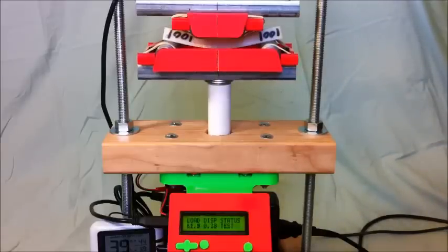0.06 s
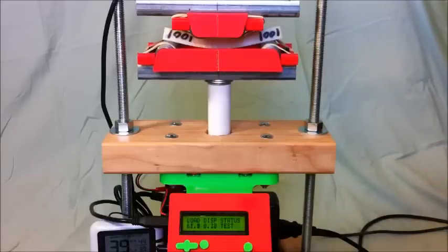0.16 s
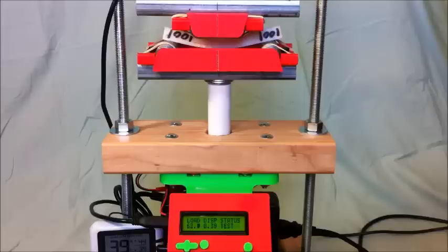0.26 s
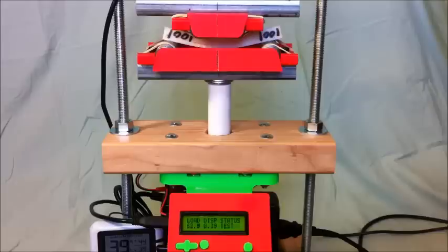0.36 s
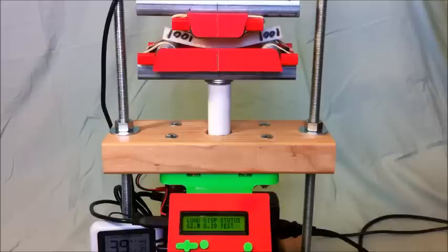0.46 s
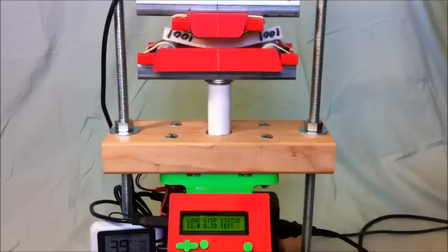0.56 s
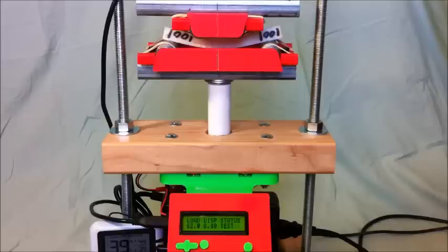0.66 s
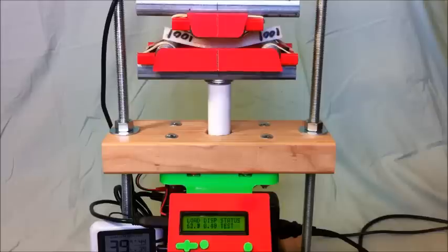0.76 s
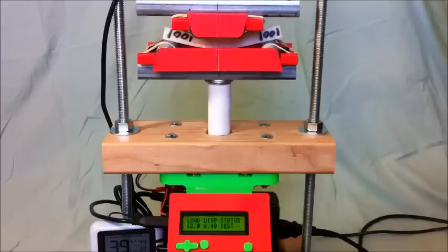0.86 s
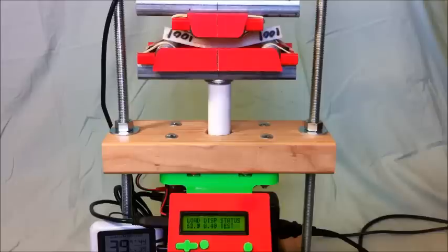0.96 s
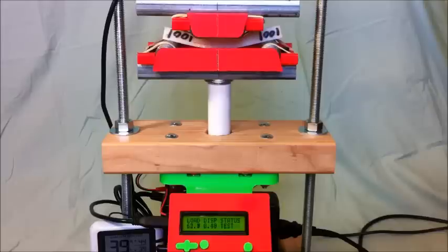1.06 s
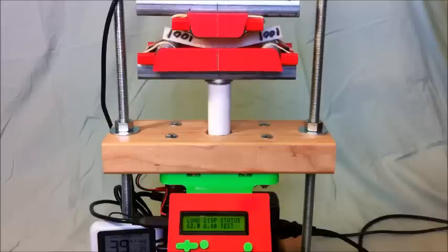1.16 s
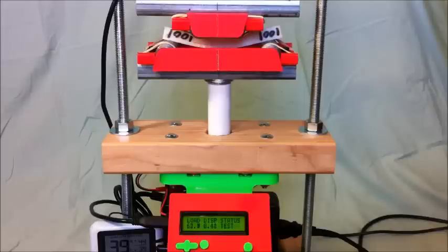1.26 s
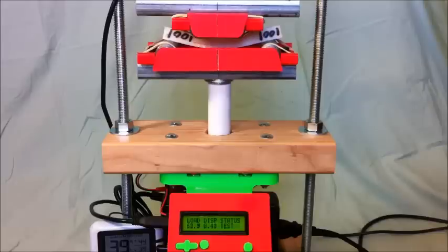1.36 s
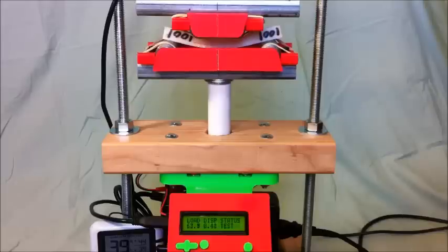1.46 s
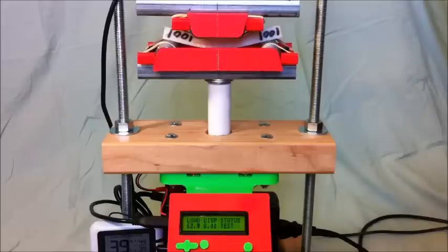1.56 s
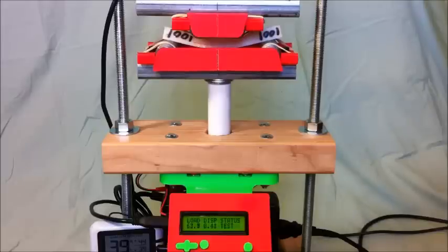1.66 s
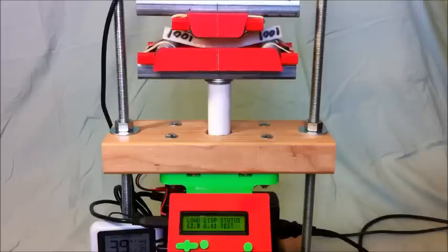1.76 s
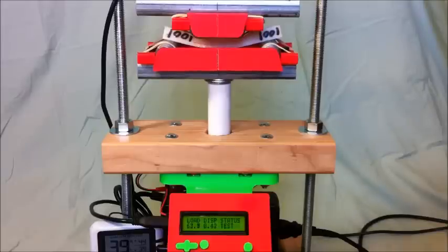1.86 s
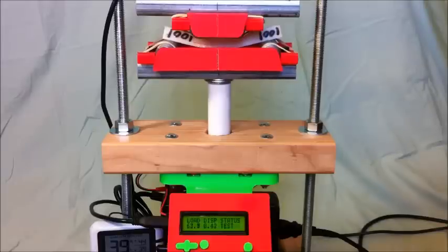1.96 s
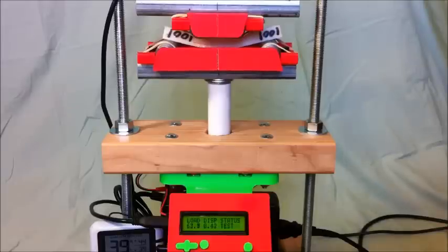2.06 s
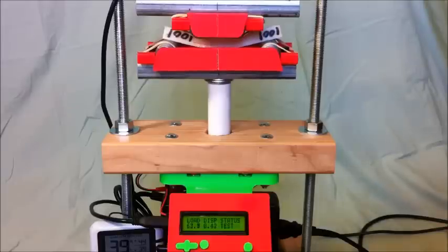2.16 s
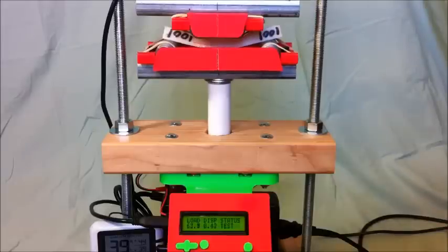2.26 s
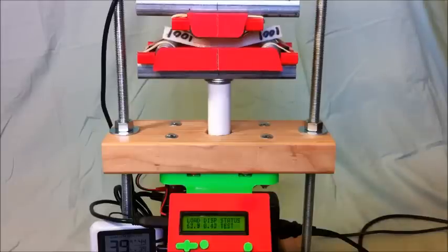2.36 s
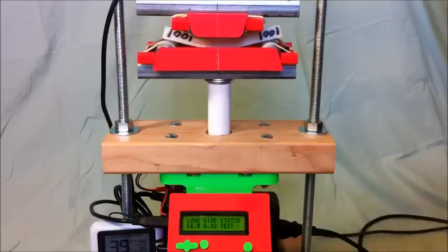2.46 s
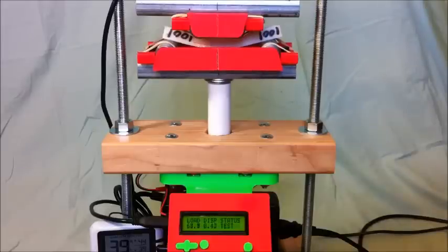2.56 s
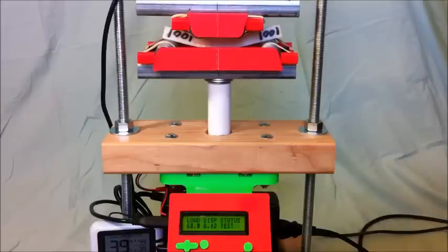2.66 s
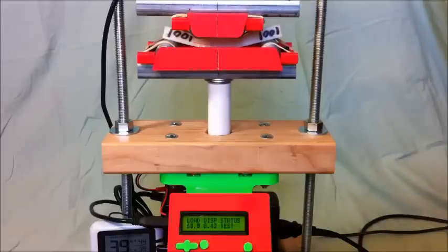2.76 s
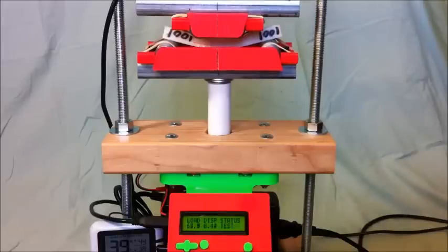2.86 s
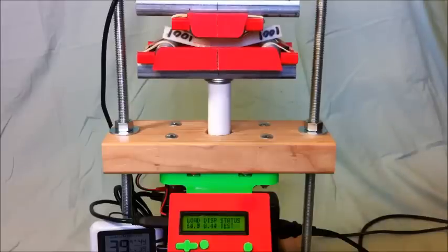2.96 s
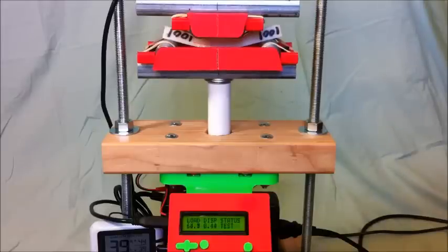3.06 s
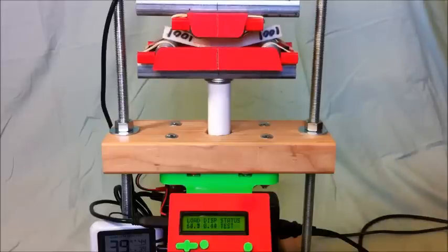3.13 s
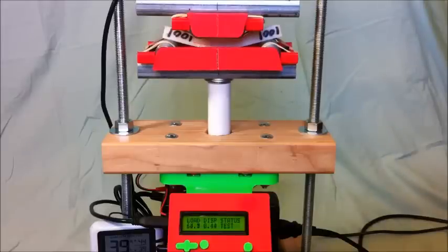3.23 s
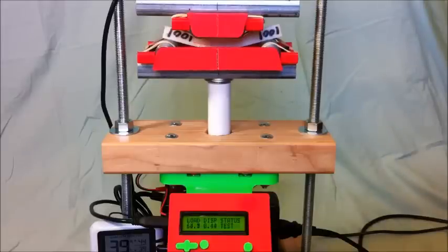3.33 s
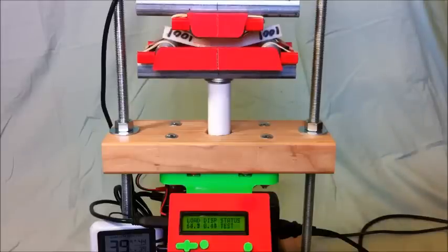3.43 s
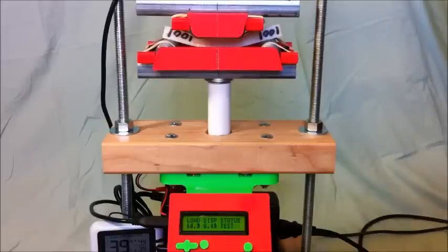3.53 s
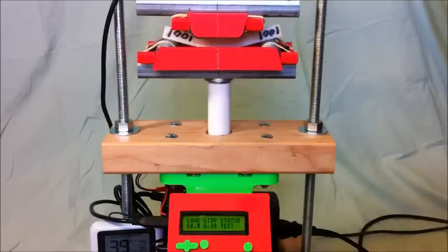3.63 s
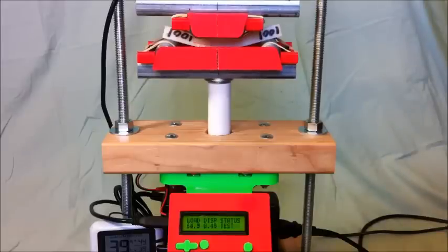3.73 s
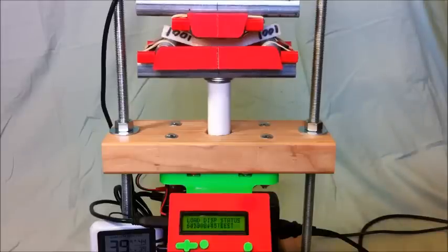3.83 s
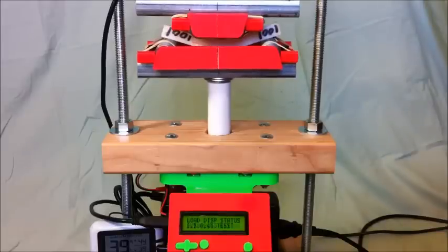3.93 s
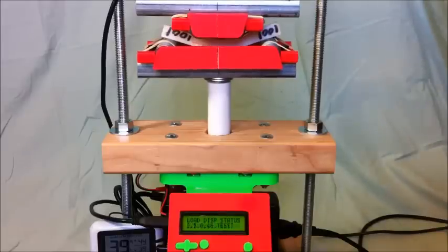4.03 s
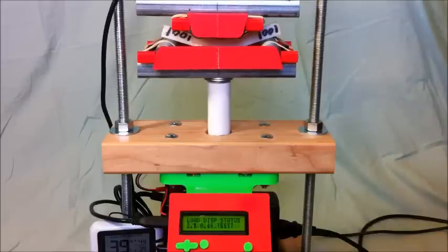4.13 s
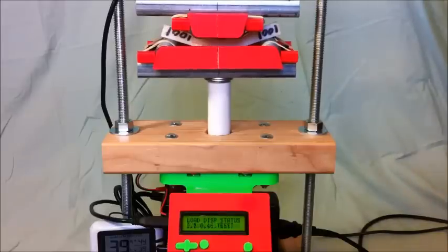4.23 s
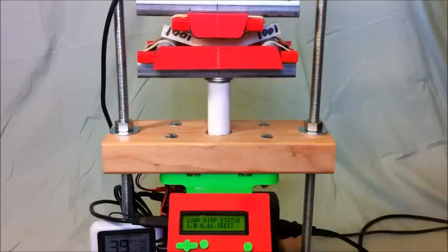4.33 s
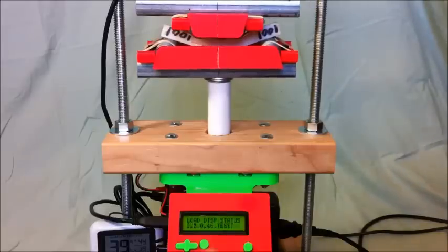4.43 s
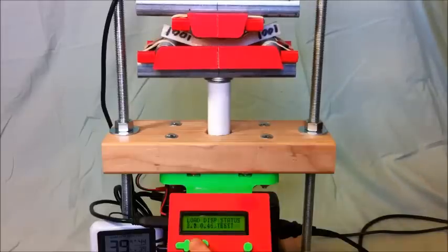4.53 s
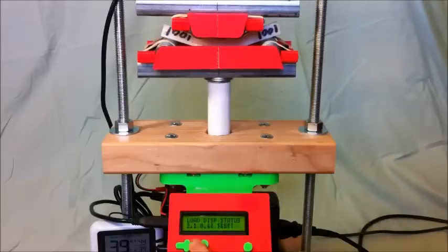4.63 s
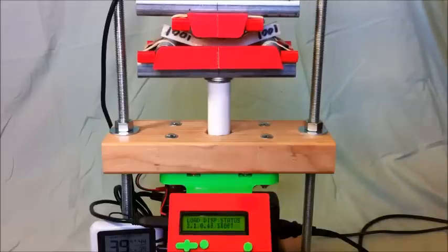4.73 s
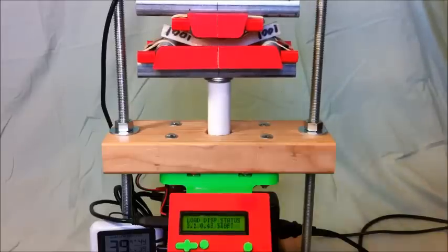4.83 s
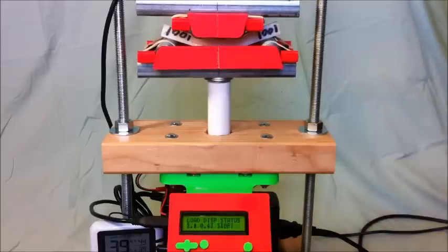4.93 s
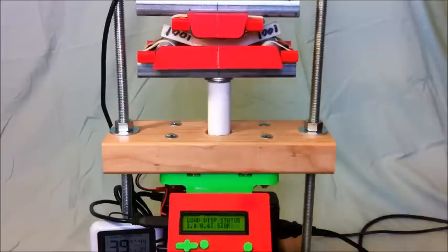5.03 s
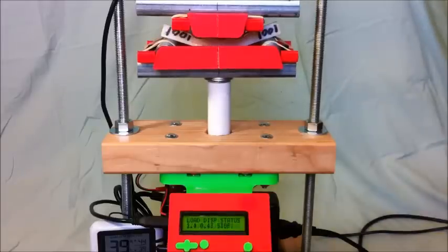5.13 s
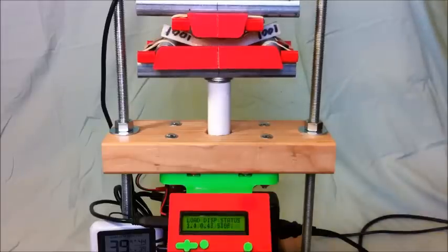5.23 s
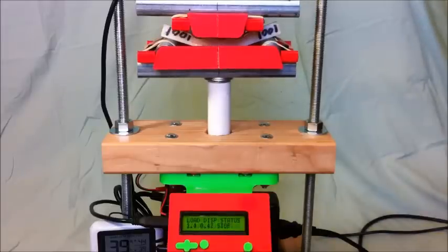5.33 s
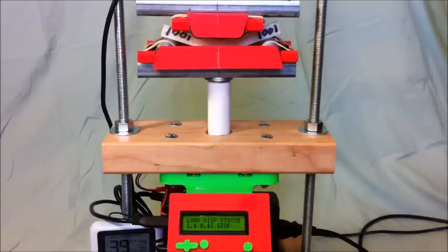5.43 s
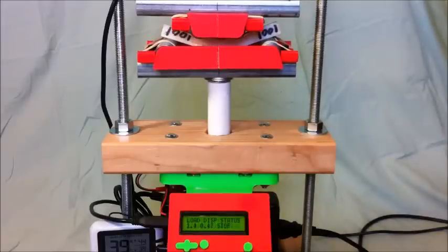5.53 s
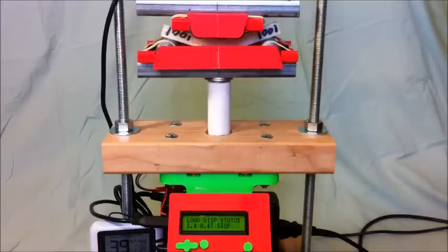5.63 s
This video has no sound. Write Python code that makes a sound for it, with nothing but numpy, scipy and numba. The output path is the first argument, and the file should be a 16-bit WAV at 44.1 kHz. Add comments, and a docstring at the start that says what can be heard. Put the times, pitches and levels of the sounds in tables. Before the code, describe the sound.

A stepper motor buzzes steadily as a press loads a plastic part, rattling, until a sharp crack; the motor stops and a small fan whines on.

```python
"""Stepper-driven screw press

A stepper motor drives a press of wood, threaded rods and plastic jaws, close to a microphone.
Each step is a knock filtered by the frame, with noise for gear grind; loose parts rattle in bursts.
The specimen ticks and cracks as noise bursts through jaw resonances, over a faint unsteady low noise.
The motor stops; a small fan, summed blade tones over shaped noise, whines on."""
import sys
import numpy as np
from scipy import signal
from scipy.fft import rfft, irfft, next_fast_len
from scipy.io import wavfile
from scipy.ndimage import uniform_filter1d
from numba import njit

SR = 44100
rng = np.random.default_rng(int(sys.argv[2]) if len(sys.argv) > 2 else 0)


def persist_wave(psi):
    """Save psi, clipped to +-1, as 16-bit WAV."""
    counts = np.round(np.clip(psi, -1, 1) * 32767).astype(np.int16)
    wavfile.write(sys.argv[1], SR, np.atleast_2d(counts).T)


N = 250929
T = np.arange(N) / SR

# motor stages, the frame settling differently in each: start_s, end_s, step_rate_hz
MOTOR_STAGES = [(.0006, 1.1294, 124.02), (1.1294, 2.2984, 124.02), (2.2984, 3.1141, 120.15),
                (3.1141, 3.8806, 120.15), (3.8806, 4.668, 124.02)]
# ticks of the specimen, the third is the crack:
# start_s, peak_db, tail_t60_s, tail_share (ratio), struck_centre_hz, reach_octaves
FRACTURES = [(1.9681, -23.5, 0.065, 0.58, 3220, 1.05), (3.117, -33.5, .05, .6, 1570, 0.18),
             (3.8785, -8, 0.063, 1, 3980, 3.6), (4.7065, -38, .03, .3, 4500, 0.9),
             (5.019, -40, .02, .2, 6000, 4.6), (5.2044, -39, .03, .3, 8000, 0.61)]
CRACK_S = FRACTURES[2][0]
LAST_STAGE_S, MOTOR_STOP_S = MOTOR_STAGES[-1][:2]


def undb(db):
    """Decibels to amplitude ratio."""
    return 10 ** (np.asarray(db) / 20)


def unit(x):
    """Scale to rms 1."""
    return x / np.sqrt(np.mean(x ** 2))


def columns(table):
    """Table columns interpolated over time, one value per sample."""
    time_s, *values = np.transpose(table)
    return [np.interp(T, time_s, v) for v in values]


def walk(rate_hz):
    """Random levels held 1 / rate_hz and slewed twice; spread near 1."""
    hold = int(SR / rate_hz)
    held = np.repeat(rng.standard_normal(N // hold + 1), hold)
    return 1.307 * uniform_filter1d(uniform_filter1d(held, hold), hold)[:N]


def response(points, size=8192):
    """Minimum-phase impulse response through (Hz, dB) points, from the folded cepstrum."""
    hz, db = np.transpose(points)
    grid_hz = np.maximum(np.arange(size // 2 + 1), 1) * SR / size
    cepstrum = irfft(np.interp(np.log(grid_hz), np.log(hz), db) * np.log(10) / 20)
    cepstrum[1:size // 2] *= 2
    cepstrum[size // 2 + 1:] = 0
    return irfft(np.exp(rfft(cepstrum)))[:size // 2]


def filtered_noise(order, cutoff_hz):
    """Low-passed white noise."""
    sos = signal.butter(order, cutoff_hz, fs=SR, output="sos")
    return signal.sosfilt(sos, rng.standard_normal(N))


def rumble():
    """Faint unsteady low noise, stronger until the motor stops; the crack jolts it."""
    deep_noise, low_noise = unit(filtered_noise(4, 70)), unit(filtered_noise(4, 280))
    low_noise_level = undb(-98 + 10 * np.minimum(walk(55), 1.7) - 20 * (T > MOTOR_STOP_S))
    age_s, jolt_t60_s = np.maximum(T - CRACK_S, 0), 0.11
    jolt = undb(-60) * (age_s > 0) * undb(-60 * age_s / jolt_t60_s)
    sway_db = 2.4 * walk(14)
    return deep_noise * undb(-86.5 + sway_db) + low_noise * (low_noise_level + jolt)


def fan():
    """Harmonics of a slightly wavering blade rate, the 15th being the whine, over the rush of air."""
    # whine: time_s, whine_hz (15 x blade rate), whine_db
    whine_curve = [(0.0, 8740, -49), (0.47, 8596, -53), (2.84, 8660, -51), (4.01, 8620, -54.5),
                   (4.64, 8620, -54.5), (4.9, 8586, -52), (5.69, 8500, -51.5)]
    # tones: multiple of blade rate (ratio), level_db against the whine
    blade_tones = [(1, -26), (2, -25), (4, -24), (5, -15.5), (7, -18), (9, -22.5), (10, -14), (11, -21),
                   (12, -16), (15, -4.5), (16, -17.5), (20, -27.5), (23, -68), (25, -22)]
    # level of all tones but the whine: they swell while the motor runs, then drop back
    # as it stops: time_s, change_db
    body_curve = [(0, -4.5), (4.6, 4), (4.75, -1), (5.69, 0.5)]
    # spectral shape of the air noise: pitch_hz, relative density_db per Hz
    air_shape = [(100, -125), (200, -130), (320, -110), (500, -99), (1200, -100), (2000, -96.5),
                 (2500, -92.5), (3100, -93.5), (3700, -87.5), (4600, -94), (6000, -98.5), (8500, -91),
                 (9500, -98.5), (12000, -100), (15700, -99)]
    air_db = -55.5

    whine_hz, whine_db = columns(whine_curve)
    body_db, = columns(body_curve)
    blade_hz = whine_hz / 15 * (1 + 0.000745 * walk(30))
    turn = 2 * np.pi * np.cumsum(blade_hz) / SR
    tones = np.zeros(N)
    for k, db in blade_tones:
        tone_db = db + (k != 15) * body_db + 0.96 * walk(25.41)
        tones += undb(tone_db) * np.sin(k * turn + 2 * np.pi * rng.random())
    air = unit(signal.fftconvolve(rng.standard_normal(N), response(air_shape))[:N])
    return np.sqrt(2) * tones * undb(whine_db) + air * undb(air_db + 0.09 * walk(5.7))


def ring(x, modes):
    """Sum of parallel resonances (Hz, width Hz, dB)."""
    return sum(undb(db) * signal.lfilter(*signal.iirpeak(hz, hz / width_hz, SR), x)
               for hz, width_hz, db in modes)


def ticks():
    """A sharp break, a burst of tearing fibres and a scattered tail ring the jaws."""
    # jaw and specimen modes, before weighting by distance from the struck centre:
    # pitch_hz, width_hz, level_db
    jaw_modes = [(597, 500, -14), (860, 58, -4), (1270, 180, -1), (1480, 95, 9), (2000, 540, -12),
                 (2300, 490, -9.5), (3560, 440, -8), (5350, 1000, -13.5), (6570, 700, -9.5),
                 (9700, 1300, -7), (12600, 2900, -2.5), (15400, 1800, -21)]
    high_pass = signal.butter(3, 450, "high", fs=SR, output="sos")
    out = np.zeros(N)
    age_s = np.arange(SR // 5) / SR
    for start_s, peak_db, t60_s, tail_share, centre_hz, reach_oct in FRACTURES:
        envelope = np.exp(-(age_s / 0.0015) ** 4) + tail_share * undb(-60 * age_s / t60_s)
        burst = envelope * np.minimum(age_s / .0003, 1) * rng.standard_normal(len(age_s))
        burst[20] += 5.5  # the sharp break
        struck = [(hz, width_hz, db - 12 * (np.log2(hz / centre_hz) / reach_oct) ** 2)
                  for hz, width_hz, db in jaw_modes]
        hit = signal.sosfilt(high_pass, ring(burst, struck))
        i = int(start_s * SR)
        out[i:i + len(age_s)] += undb(peak_db) * hit / np.abs(hit).max()
    return out


def steps(start_s, end_s, rate_hz, jitter_s, scatter_db):
    """One band-limited knock per step, a little uneven in time and size."""
    at_s = np.arange(start_s, end_s, 1 / rate_hz)
    chance = rng.standard_normal((len(at_s), 2))
    place = np.maximum((at_s + jitter_s * chance[:, 0]) * SR, 8)
    taps = place.astype(int)[:, None] + np.arange(-8, 9)
    offset = taps - place[:, None]
    # windowed sinc places each knock between samples
    knocks = undb(scatter_db * chance[:, 1:]) * np.sinc(offset) * np.cos(np.pi * offset / 18) ** 2
    out = np.zeros(N)
    np.add.at(out, taps, knocks)
    return out


def spread(h, spread_s):
    """Sound leaves the frame at many places: each frequency arrives with its own lag."""
    size = 2 * len(h)
    lag = np.repeat(rng.random(64), size // 128)
    smooth_lag_s = uniform_filter1d(lag, size // 128) * spread_s
    phase = np.cumsum(smooth_lag_s) * 2 * np.pi * SR / size
    return irfft(rfft(h, size) * np.exp(-1j * np.append(0, phase)))[:len(h)]


def parts(x, span):
    """Split into the bands where the frame parts ring, each at rms 1 over the span."""
    # band edges of the parts, low to high: edge_hz
    part_edges_hz = [310, 680, 1050, 1280, 1600, 2150, 2450, 2850, 3700, 4700, 5900, 8300, 12000, 16000]
    size = next_fast_len(N)
    spectrum, hz = rfft(x, size), np.arange(size // 2 + 1) * SR / size
    below = [1 / (1 + np.exp(np.clip((hz - edge_hz) / 15, -50, 50))) for edge_hz in part_edges_hz]
    out = np.array([irfft(spectrum * (hi - lo), size)[:N] for lo, hi in zip(below, below[1:])])
    return out / np.sqrt(np.mean(out[:, span] ** 2, axis=1, keepdims=True))


def edge(since_s, width_s):
    """Smooth switch from 0 to 1 around since_s = 0."""
    return .5 + .5 * np.tanh(since_s / width_s / 2)


def ringing():
    """Level of every part in dB: settled level, slack near the crack, rattle bursts, wander, stop."""
    # level_db per motor stage, before slack; rows: table, screw, rods, motor can, housing,
    # coupling, jaws, washers, nuts
    settled_db = [(-63.5, -62, -65.5, -64.5, -61), (-61.5, -59.5, -59.5, -64.5, -53.5),
                  (-54.0, -56.0, -57, -56, -49), (-58.5, -58.5, -56.5, -60, -57.5),
                  (-57.0, -56.5, -55.5, -56.5, -57), (-61.5, -59.5, -59.5, -60.5, -57.5),
                  (-61.5, -58.5, -60.5, -65, -58.5), (-61.5, -60.5, -61.5, -63, -54),
                  (-72, -69, -69.5, -76, -67)]
    # hum carried by parts as the load shifts: time_s, beam_db, crossbar_db, plates_db, gearbox_db
    hum_curve = [(0.0, -56.5, -59, -60, -51.5), (0.17, -59.5, -62, -61.5, -54),
                 (0.22, -61, -63.5, -49.5, -58), (0.55, -61.5, -60.5, -50.5, -50),
                 (1.1, -59.5, -62, -57.5, -53.5), (1.35, -57.5, -63, -56, -54.5),
                 (1.95, -56.0, -60, -58.5, -57), (2.08, -57, -60, -61.0, -52), (2.12, -55.5, -61, -70, -49),
                 (2.3, -54.5, -62.0, -58.5, -55), (2.33, -53, -60.5, -58.5, -53),
                 (2.95, -54.0, -62, -61, -54.5), (3.05, -55.5, -55.5, -62, -55.0),
                 (3.35, -55.5, -56.5, -58.5, -54.5), (3.6, -61.5, -54.5, -57.0, -59),
                 (3.87, -56.5, -55.5, -57, -52.5), (3.92, -60.5, -64.0, -55, -66),
                 (4.2, -60.0, -54.5, -62, -58.5), (4.6, -57, -54, -52, -59),
                 (4.67, -55.5, -56.5, -58, -60.5)]
    # bursts, before each part's share: start_s, length_s, plates_db, screw_db,
    # gearbox_and_rods_db, housing_db, jaws_db, washers_and_nuts_db
    rattle_bursts = [(0.168, 0.048, -70.0, -70.0, -68, -49.5, -58.5, -53),
                     (0.463, 0.043, -68, -70.0, -47.0, -66, -68, -64),
                     (1.141, 0.017, -52, -52, -43.5, -58, -47, -51),
                     (1.175, 0.026, -70.0, -50, -47, -51.5, -60, -56),
                     (1.244, 0.013, -70.0, -49, -52, -51.0, -49, -49),
                     (1.32, 0.077, -55, -60.5, -43, -51, -46.5, -48.5),
                     (1.401, 0.044, -50.5, -54, -51.0, -52, -59, -52),
                     (1.453, 0.044, -59, -51, -46.5, -46.5, -47.5, -48),
                     (1.569, 0.059, -65, -50, -72, -47.5, -51.0, -51.0),
                     (1.623, 0.045, -48.5, -49, -49.0, -50.5, -47.5, -46.5),
                     (1.725, 0.038, -49.5, -49, -49.5, -55, -49, -55),
                     (1.977, 0.11, -59, -55, -54, -53, -62, -52),
                     (2.068, 0.098, -72, -65, -52.5, -64, -67, -53),
                     (3.139, 0.314, -73, -64, -74, -68, -56.5, -66),
                     (3.47, 0.38, -74, -78, -59, -59.0, -70.0, -72),
                     (4.02, 0.038, -70.0, -62.5, -52, -70.0, -70.0, -70.0),
                     (4.112, 0.031, -70.0, -59, -39.5, -70.0, -66.0, -59),
                     (4.205, 0.045, -70.0, -54.5, -47.5, -56, -56, -60.5),
                     (4.414, 0.085, -55, -51.5, -38.0, -47.0, -47, -47),
                     (4.505, 0.032, -68.0, -58, -57, -48, -53.0, -54.5),
                     (4.619, 0.04, -51, -49, -39, -43, -47.5, -42.5)]
    # for each part from the plates up: burst level column (index)
    burst_column = [0, 1, 2, 2, 3, 3, 3, 4, 5, 5]
    # how strongly its burst shakes each part from the plates up: share_db
    burst_share_db = [2.6, 0.2, -17.5, 0.1, -3, -5, -4, -1.1, -0.6, -6]
    # slow wander of each part, low to high: spread_db
    wander_spread_db = [0.8, 0.92, 1.8, 1.3, 1.9, 1.5, 1.36, 0.79, 1.24, 0.89, 1.1, 0.65, 0.5]
    slack_db, tighten_s = -8, 0.33
    rise_s, fall_s = 0.0052, .010
    stop_db_per_s = -900

    stage = np.searchsorted([s[0] for s in MOTOR_STAGES[1:]], T)
    since_s = T - LAST_STAGE_S
    # goes slack as the last stage starts, then tightens again
    slack = slack_db * (since_s > 0) * np.exp(-np.abs(since_s) / tighten_s)
    table, screw, *rest = np.array(settled_db)[:, stage] + slack
    beam, crossbar, plates, gearbox = columns(hum_curve)
    power = undb([table, beam, crossbar, plates, screw, gearbox, *rest]) ** 2
    shake = 0
    for start_s, length_s, *db in rattle_bursts:
        gate = edge(T - start_s, rise_s) * edge(start_s + length_s - T, fall_s)
        shake = shake + undb(db)[:, None] ** 2 * gate ** 2
    power[3:] += undb(burst_share_db)[:, None] ** 2 * shake[burst_column]
    wander = [db * walk(25) for db in wander_spread_db]
    return 10 * np.log10(power) + wander + stop_db_per_s * np.maximum(T - MOTOR_STOP_S, 0)


def motor():
    """Clean knocks through the frame, plus gear grind that flares after each step."""
    # what a step rings with, one table per stage: multiple of step rate (ratio), relative level_db
    taking_up = [(1, -46), (2, -42), (3, -23), (4, -8), (5, -7.5), (6, -40), (7, -18), (8, -25.5), (9, -2),
                 (10, -10.5), (11, 4), (12, 3), (13, -13), (14, -17), (15, -22), (16, -16), (17, -16.5),
                 (18, 1), (19, 6.5), (20, -20), (21, 2), (22, -11), (23, -45), (24, -2.5), (25, -23),
                 (26, -25), (27, -2.5), (28, -15), (29, -9), (30, -8), (31, -10), (32, 0.5), (33, -11),
                 (34, -21), (35, -5), (36, -6), (37, -21), (38, -18), (39, -21), (40, -31), (41, -12),
                 (42, -17), (43, -30), (44, -17), (45, -26), (46, -18), (47, -20), (48, -29), (49, -12),
                 (50, -22), (51, -10), (52, -25), (53, -22), (54, -7), (55, -18), (56, -20)]
    loading = [(1, -44), (2, -27), (3, -14.5), (4, 4), (5, 0), (6, -26), (7, -11.5), (8, -13), (9, -21.5),
               (10, -24.5), (11, 11.5), (12, 17), (13, -14), (14, -14.5), (15, -12.5), (16, -11.5),
               (17, -14.5), (18, -1), (19, 0), (20, 2), (21, 17), (22, 4), (23, -9), (24, -18), (25, -14),
               (26, -23), (27, -7), (28, -19), (29, -9), (30, -13), (31, -20), (32, -6.5), (33, -36),
               (34, -8.5), (35, -16), (36, -9.5), (37, -15), (38, -17), (39, -12.5), (40, -26), (41, -9),
               (42, -11), (43, -23), (44, -13), (45, -12), (46, -20), (47, -12), (48, -15), (49, -21),
               (50, 0), (51, -19), (52, -3), (53, -2), (54, -12), (55, -17), (56, -8)]
    straining = [(1, -25), (2, -31), (3, -32), (4, -8), (5, -15), (6, 1.5), (7, 10.5), (8, 10), (9, -18.5),
                 (10, -13), (11, -13), (12, -2), (13, -9), (14, -18), (15, -14), (16, -13), (17, -9),
                 (18, -9), (19, 5), (20, -8), (21, -9.5), (22, -17), (23, -17), (24, -24), (25, -16),
                 (26, -13), (27, -9), (28, 1), (29, -30), (30, -5), (31, -5), (32, 4.5), (33, -8),
                 (34, 0.5), (35, -10), (36, -5), (37, 2.5), (38, -11), (39, -2), (40, -32), (41, -30),
                 (42, -13), (43, -20), (44, -13), (45, -20), (46, -24), (47, -30), (48, -25), (49, -35),
                 (50, -4), (51, -20), (52, -16), (53, -10), (54, -8), (55, -26), (56, -11)]
    yielding = [(1, -36), (2, -38), (3, -21.5), (4, -2.5), (5, -4), (6, -19), (7, -13.5), (8, -15.5),
                (9, -3.5), (10, 12), (11, -16.5), (12, -1), (13, -11), (14, -17), (15, -18), (16, -15),
                (17, -21), (18, -14), (19, -2), (20, -13), (21, 7), (22, 3), (23, 2.5), (24, -29),
                (25, -16), (26, -16), (27, -25), (28, -11), (29, -28), (30, -15), (31, -11), (32, -1),
                (33, -11), (34, -3), (35, -4), (36, -9), (37, -5), (38, -16), (39, -11), (40, -24),
                (41, -7), (42, -10), (43, -2), (44, -16), (45, -18), (46, -1), (47, -22), (48, -13),
                (49, -19), (50, -11), (51, -8), (52, -11), (53, -14), (54, 0), (55, -26), (56, -20)]
    released = [(1, -70), (2, -34), (3, -28), (4, -9), (5, -9), (6, -41.5), (7, -13), (8, -43), (9, 6),
                (10, 4), (11, 8), (12, 13), (13, -9.5), (14, -3), (15, -16), (16, -3.5), (17, -5.5),
                (18, -17), (19, -18), (20, -4), (21, 12), (22, 4), (23, -10), (24, -28), (25, -17),
                (26, -24), (27, -20), (28, -15.5), (29, -23), (30, -25), (31, -13), (32, -8), (33, -20),
                (34, -19), (35, -8), (36, -26), (37, -20), (38, -15), (39, -28), (40, -25), (41, -16),
                (42, -40), (43, -25), (44, -16), (45, -20), (46, -18), (47, -36), (48, -23), (49, -17),
                (50, -17), (51, -40), (52, -15), (53, -12), (54, -16), (55, -31), (56, -22)]
    # treble of a step, before its offset: pitch_hz, density_db per Hz
    buzz_shape = [(4120, -34), (7000, -4), (7940, -19), (8220, -49), (8330, -0.5), (8880, -3), (9160, -5.5),
                  (10800, -3), (12400, -12), (14600, -11), (15800, -14.5)]
    buzz_offset_db = -4
    # gear grind against the clean knock, per part, before rattling: level_db
    grind_base_db = [-15.5, -14.5, -14, -10.5, -6.5, -12, -9, -4, -9, -2.5, -4.5, -2, 2]
    # grind added per dB of washer rattle, less below the motor can than from it up: slope (dB/dB)
    grind_per_rattle = np.repeat([.05, .36], [7, 6])[:, None]
    # change of each part from one step to the next: spread_db
    uneven_spread_db = [2.06, 0.25, 0.76, 0.54, 1.4, 0.71, 0.96, 0.67, 0.56, 1.2, 1.1, 1.6, 0.83]

    levels_db = ringing()
    # loose parts roughen the whole frame while they rattle
    washer_rattle_db = np.clip(levels_db[-2] + 66.5, 0, 15)
    grind = undb(np.array(grind_base_db)[:, None] + grind_per_rattle * washer_rattle_db)
    treble = [(hz, db + buzz_offset_db) for hz, db in buzz_shape if hz > 7200]
    out = np.zeros((len(grind_base_db), N))
    stage_orders = (taking_up, loading, straining, yielding, released)
    for (start_s, end_s, rate_hz), orders in zip(MOTOR_STAGES, stage_orders):
        k, db = np.transpose(orders)
        frame = spread(response(list(zip(k * rate_hz, db)) + treble), 0.001153)
        # the grind is noise that flares after each step, through a slightly smoothed frame response
        smooth_db = 0.79 * db + 0.21 * uniform_filter1d(db, size=3)
        smooth_frame = response(list(zip(k * rate_hz, smooth_db)) + treble)
        span = (T >= start_s) & (T < end_s)
        step_age_s = (T - start_s) % (1 / rate_hz)
        flare = .42 + np.exp(-step_age_s / .002) * undb(3.5 * walk(120))
        knocks = steps(start_s, end_s - .002, rate_hz, 1.2e-5, 0.18)
        scrape = span * flare * rng.standard_normal(N)
        knock_parts = parts(signal.fftconvolve(knocks, frame)[:N], span)
        scrape_parts = parts(signal.fftconvolve(scrape, smooth_frame)[:N], span)
        out += (knock_parts + grind * scrape_parts) / np.sqrt(1 + grind ** 2)
    uneven_db = [db * walk(120) for db in uneven_spread_db]
    return np.sum(out * undb(levels_db) * undb(uneven_db), axis=0)


def scene():
    """Sum of all sources, one channel."""
    return (motor() + fan() + ticks() + rumble())[None]


@njit
def follow(x, attack, release):
    """Peak follower: quick up, slow down."""
    e, out = 0., np.empty(len(x))
    for i in range(len(x)):
        e += (abs(x[i]) - e) * (attack if abs(x[i]) > e else release)
        out[i] = e
    return out


def record(dry):
    """Gain control halves the dB excess of peaks over a threshold; a steep low-pass ends the treble."""
    attack_s, release_s, threshold_db, top_hz = 0.0017, .06, -26, 15850
    peak = follow(dry[0], 1 / (attack_s * SR), 1 / (release_s * SR))
    gain = np.minimum(undb(threshold_db) / (peak + 1e-9), 1) ** .5
    low_pass = signal.ellip(10, .2, 70, top_hz, fs=SR, output="sos")
    return signal.sosfilt(low_pass, dry * gain)


dry = scene()
out = record(dry)
persist_wave(out)
```